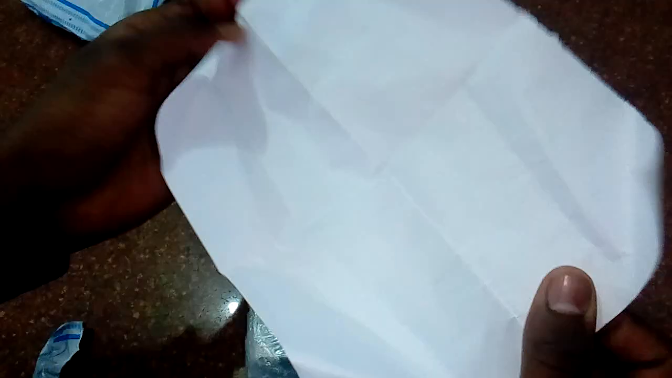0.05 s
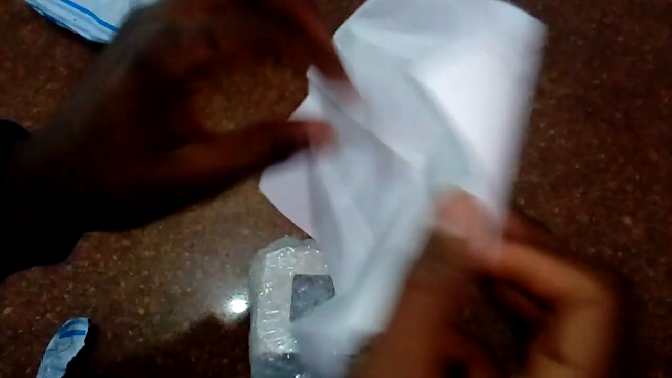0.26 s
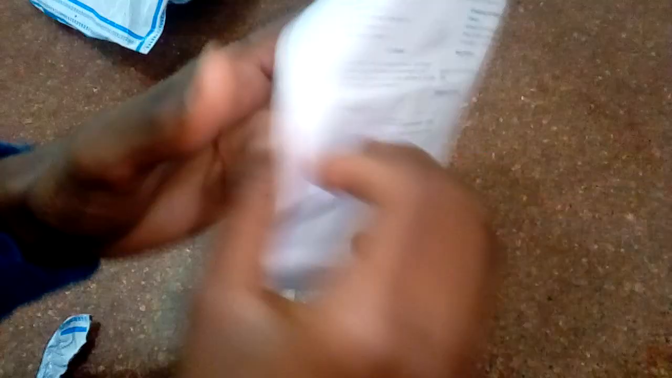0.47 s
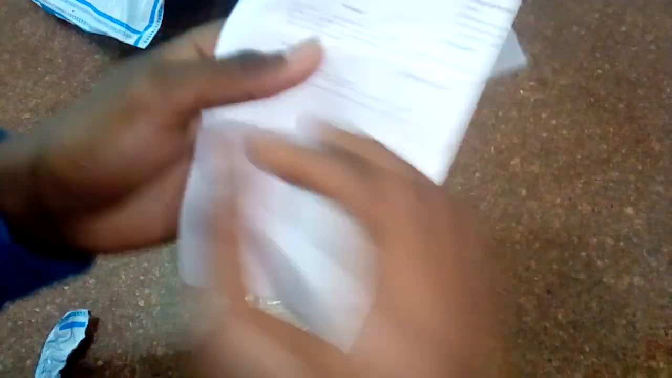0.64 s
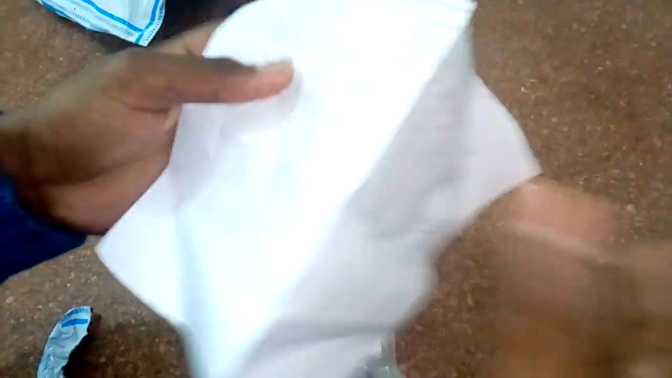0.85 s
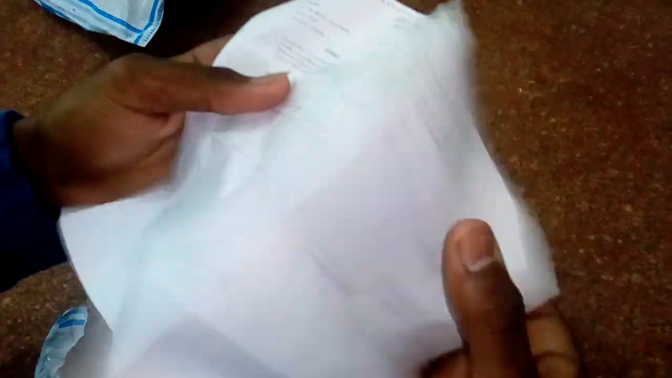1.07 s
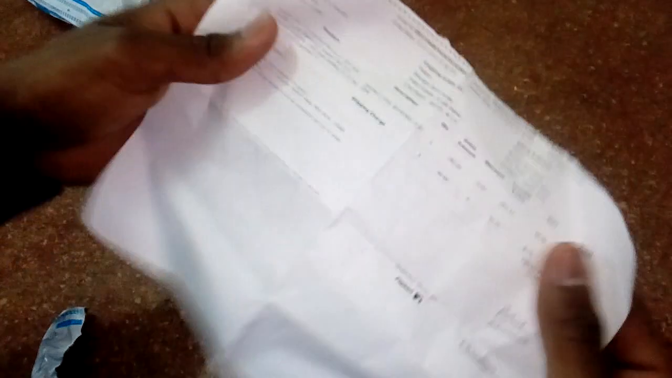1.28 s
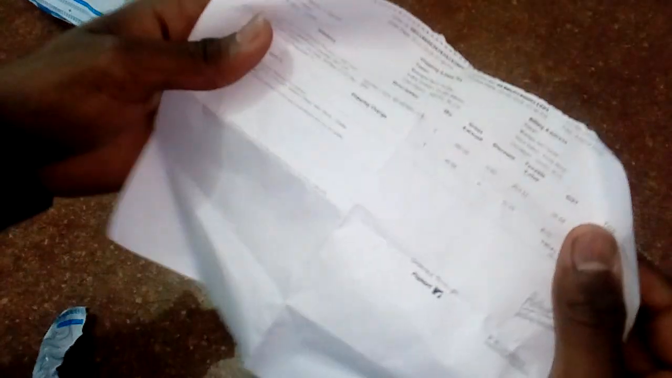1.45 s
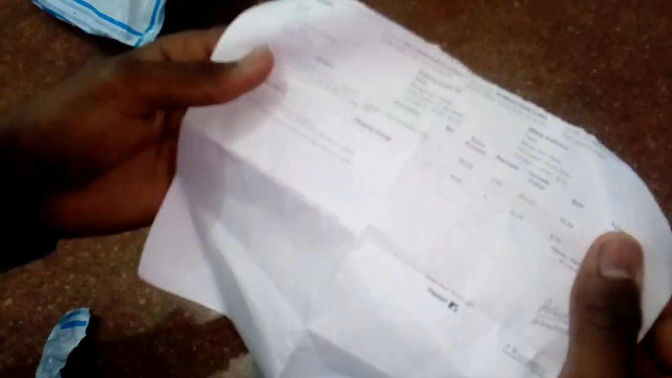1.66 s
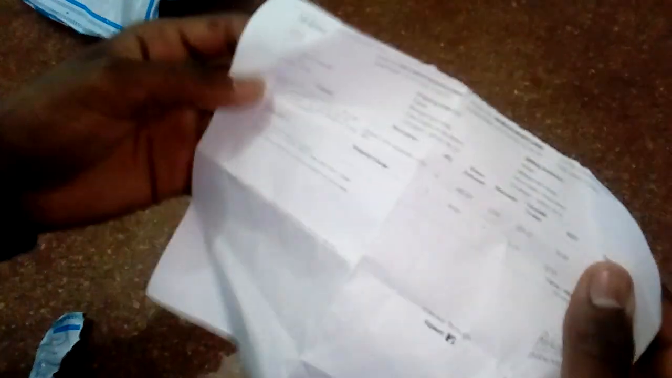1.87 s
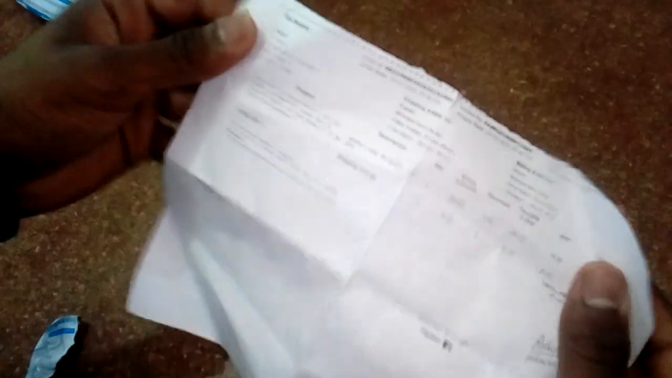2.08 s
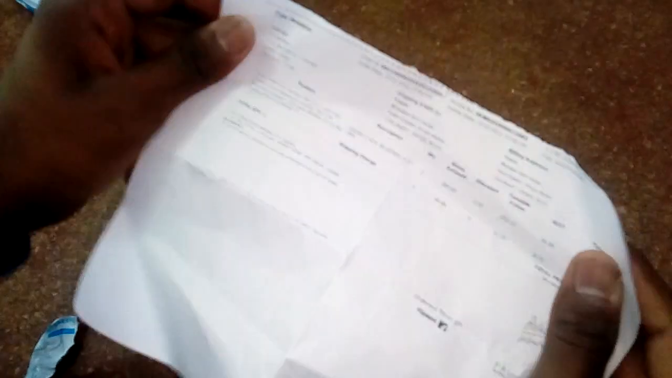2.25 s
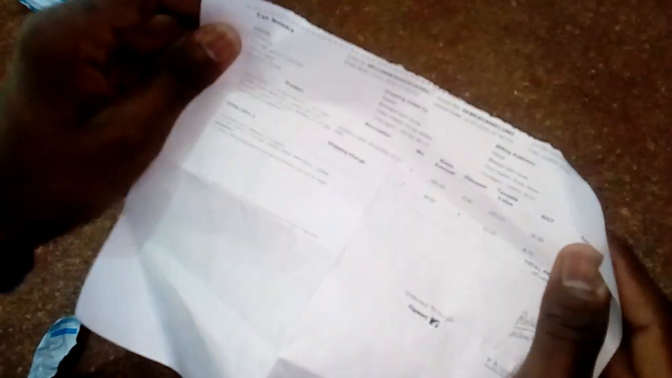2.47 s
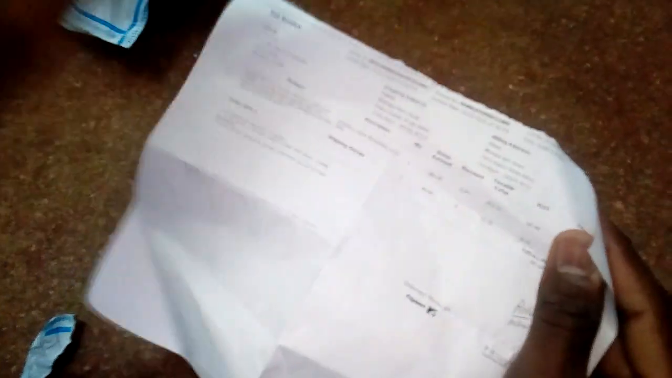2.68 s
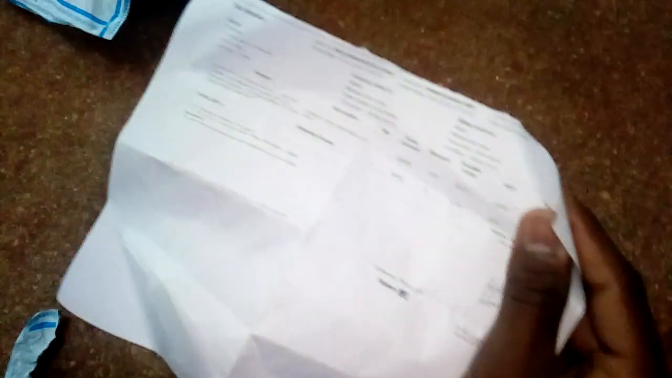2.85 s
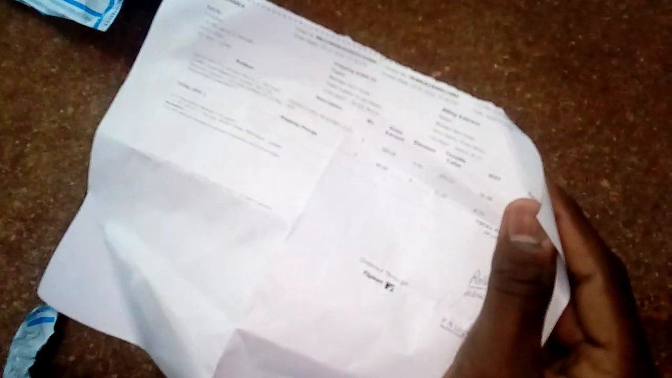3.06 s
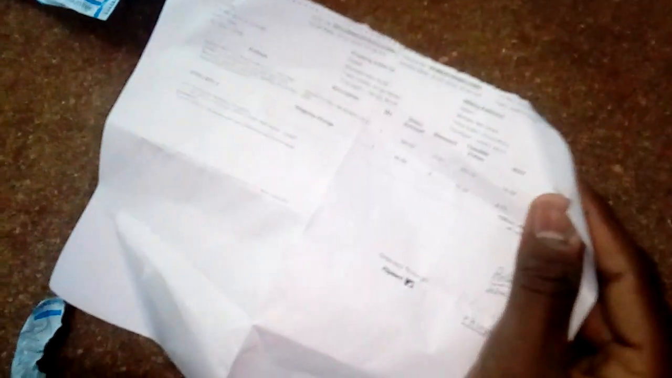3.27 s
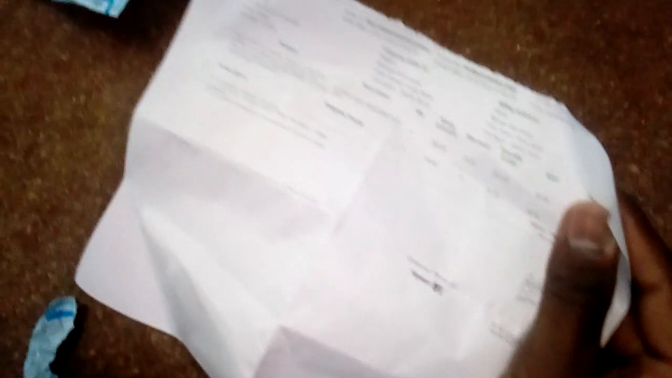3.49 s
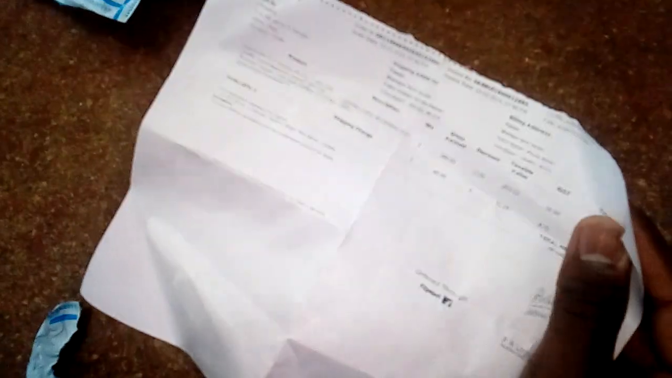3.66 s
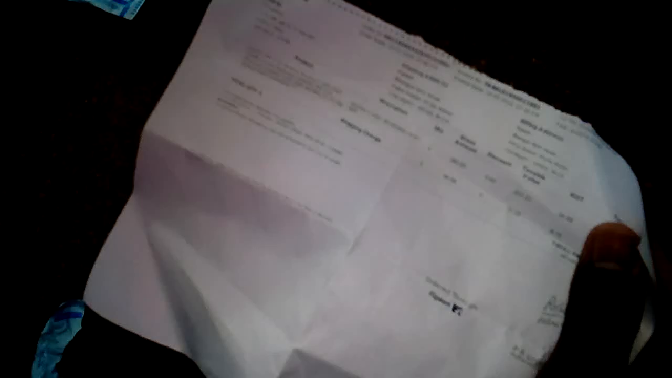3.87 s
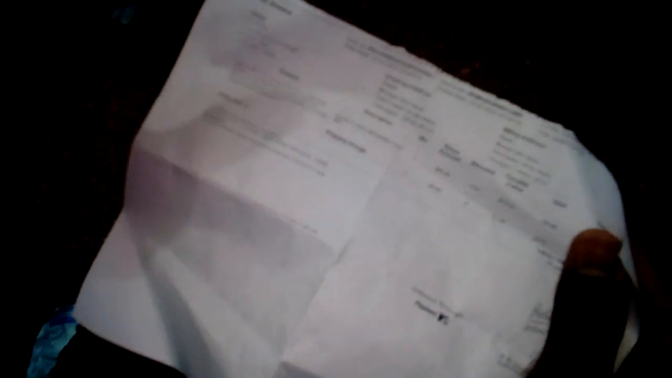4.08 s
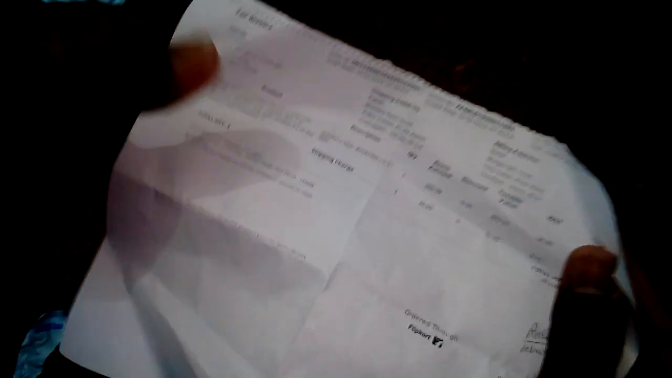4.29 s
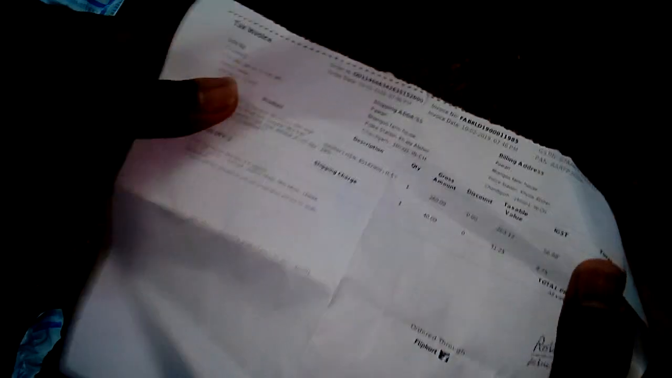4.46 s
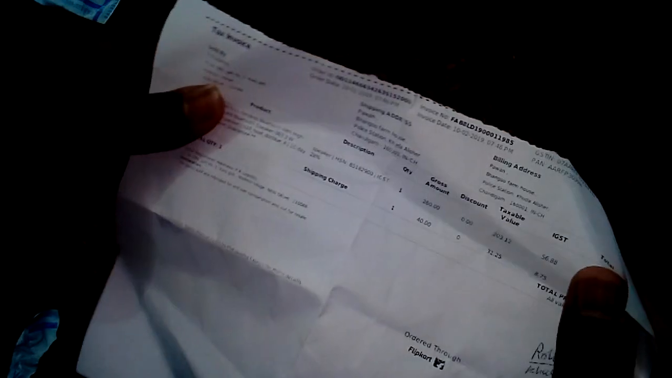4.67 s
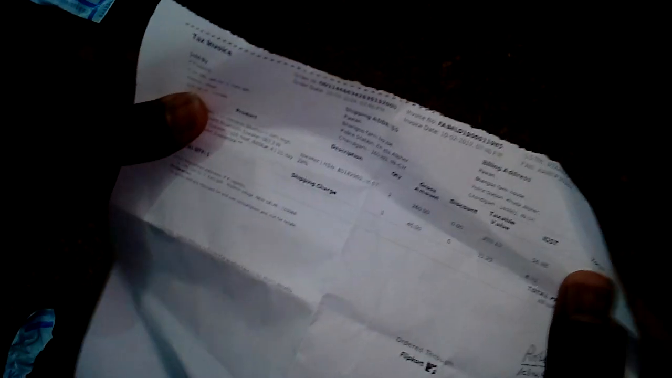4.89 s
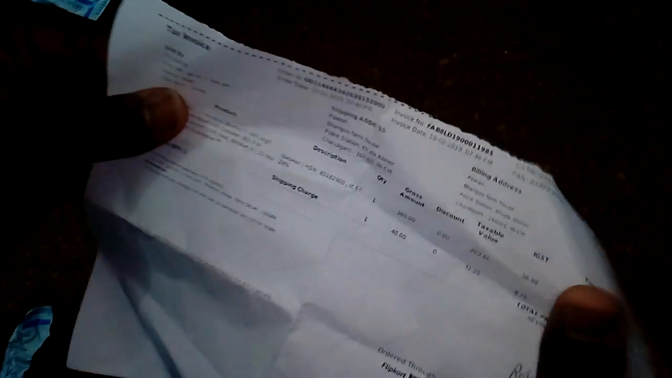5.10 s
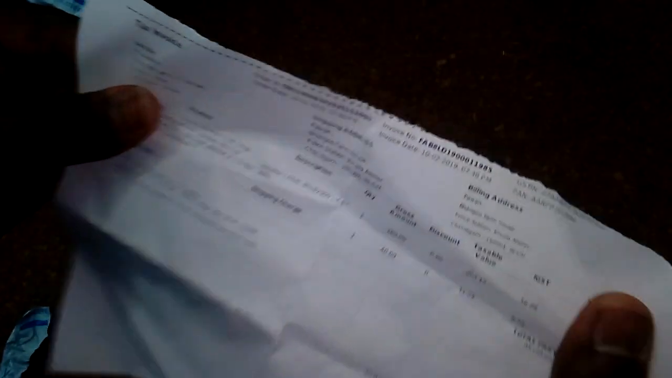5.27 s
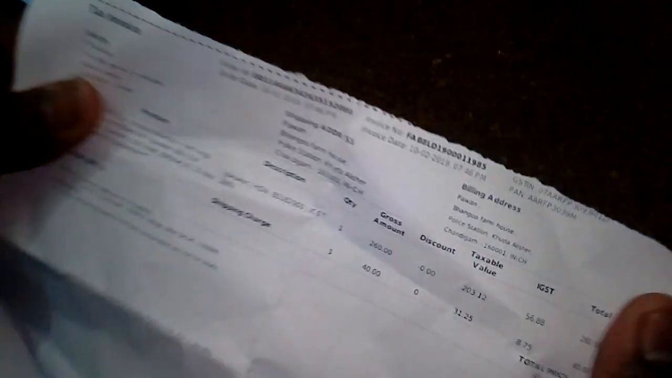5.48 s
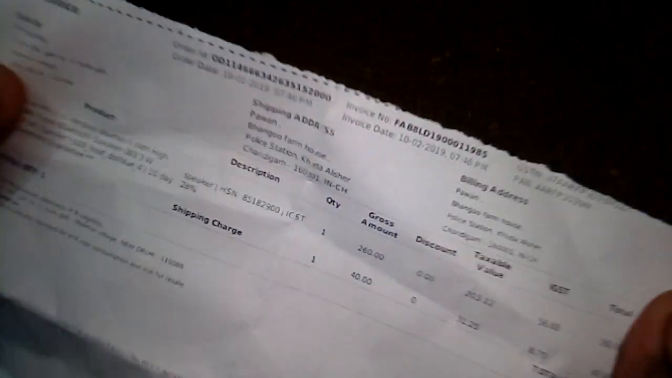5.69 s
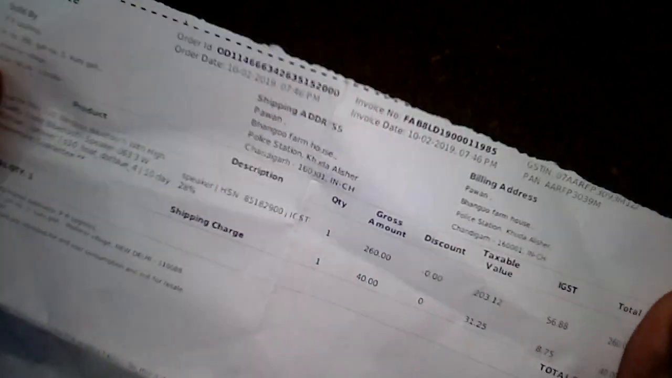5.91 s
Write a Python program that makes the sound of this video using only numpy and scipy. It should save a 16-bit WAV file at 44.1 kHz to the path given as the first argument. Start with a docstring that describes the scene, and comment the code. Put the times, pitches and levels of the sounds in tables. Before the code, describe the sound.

A creased sheet of paper is handled very close to a phone in a small, hard, quiet room. Crackling begins at once, with bright snaps in the first 0.2 seconds, a short lull, then a dense cluster from 0.4 to 0.7 with dull flapping and a puff of air. After another lull, the busiest unfolding runs from about 0.95 to 1.5 seconds: crisp cracks, coarse rustle, fine hiss and low air thumps. Lighter sliding follows, with strong snaps near 2.1, 2.2, 2.3 and 2.55. From 2.7 to about 4.4 it is almost still, except for a dry knock on the phone with a low puff at 3.36 and two fainter touches just after. Soft handling then rises, with sparse crinkles from 4.5, clearer cracks near 5.2 and 5.4, a dull pat at 5.5 and a final pair near 5.9. Low rumble, thin hiss and a faint, evenly throbbing cricket lie behind.

```python
"""Paper rustles and cracks at once: two hands unfold a creased sheet close to a phone, then shift their grip.
Creases snap through in bursts of shaped noise with a ringing fold; random slips make rustle, hiss and crinkle.
Decaying swings of the sheet push puffs of air at the microphone, and a finger knocks the phone's case. A small
hard room answers faintly as decaying noise; behind lie soft handling, a low rumble under a thin hiss, faint
rubs of thumbs on the sheet, and one far cricket, a narrow band of noise that throbs evenly."""
import sys
import numpy as np
from scipy import signal
from scipy.fft import rfft, irfft
from scipy.io import wavfile
from scipy.ndimage import uniform_filter1d

SR = 44100
rng = np.random.default_rng(int(sys.argv[2]) if len(sys.argv) > 2 else 0)


def master_out(mix):
    """Clip the mix to full scale and print it as 16-bit PCM to the path in sys.argv[1]."""
    frames = np.transpose(np.atleast_2d(mix))
    ceiling = np.clip(frames, -1, 1)
    pcm = np.round(ceiling * 32767).astype(np.int16)
    wavfile.write(sys.argv[1], SR, pcm)


N = 261954
TIME = np.arange(N) / SR


def undb(db):
    """Decibels to gain."""
    return 10 ** (np.asarray(db) / 20)


def unit(x):
    """Scale to an rms of 1."""
    return x / np.sqrt(np.mean(x ** 2) + 1e-18)


def add(out, s, x):
    """Mix x into out from time s on."""
    i = max(int(s * SR), 0)
    out[i:i + len(x)] += x[:max(len(out) - i, 0)]


def response(points, size=4096):
    """Causal minimum-phase impulse response with the given (frequency [Hz], level [dB]) colour."""
    hz, db = np.transpose(points)
    f = np.maximum(np.fft.rfftfreq(size, 1 / SR), 1)
    log_gain = np.log(undb(np.interp(np.log(f), np.log(hz), db)))
    # folding the cepstrum onto positive time makes the response causal
    cepstrum = irfft(log_gain)
    cepstrum[1:size // 2] *= 2
    cepstrum[size // 2 + 1:] = 0
    return irfft(np.exp(rfft(cepstrum)))[:size // 2]


def through(x, impulse):
    """Pass x through an impulse response."""
    return signal.fftconvolve(x, impulse)[:len(x)]


def resonate(x, hz, width_hz):
    """One resonance, gain 1 at its centre."""
    return signal.lfilter(*signal.iirpeak(hz, hz / width_hz, fs=SR), x)


def resonate_twice(x, hz, width_hz):
    """Two equal resonances in a row, for steeper flanks."""
    return resonate(resonate(x, hz, width_hz), hz, width_hz)


def walk(rate):
    """Smooth random wander with an rms of about 1, heading for a new value rate times a second."""
    k = max(int(SR / rate), 1)
    steps = np.repeat(rng.standard_normal(N // k + 1), k)
    return unit(uniform_filter1d(steps, k)[:N])


def reflect(x, lag_s, share):
    """Add the inverted echo from a nearby hand or fold; the lag may move."""
    i = np.arange(len(x))
    echo = np.interp(i - lag_s * SR, i, x, left=0)
    return x - np.clip(share, 0, .9) * echo


def slips(rate, spread_db):
    """Tiny catches and releases of fibres at random times, a few much larger than the rest."""
    hit = rng.random(N) < rate / SR
    size = undb(spread_db * np.minimum(rng.exponential(size=N), 4))
    return unit(hit * size * rng.choice([-1, 1], N))


# creases snapping through, close to the microphone; levels are rms over 8 ms:
# (time [s], flap level [dB], crack level [dB], tick level [dB], crack pitch [Hz], buckling length [s])
CREASE_SNAPS = [(0.0806, -54.5, -17.5, -36.5, 2480, 0.0031), (0.0864, -42.5, -29, -32.5, 2650, 0.00095),
                (0.1145, -38.5, -19, -29.5, 2960, 0.0037), (0.1464, -35.5, -23, -27, 2700, 0.0037),
                (0.162, -44, -32.5, -54, 2420, 0.0032), (0.392, -22.5, -22.5, -37, 2180, 0.0011),
                (0.4276, -30, -32.5, -48, 2600, 0.0039), (0.4952, -36, -20.5, -30, 2980, 0.0018),
                (0.511, -35, -23.5, -38.5, 1960, 0.0048), (0.556, -28.5, -20, -29.5, 2540, 0.0033),
                (0.5705, -25, -27.5, -30.5, 2520, 0.0018), (0.665, -35, -37, -38, 2600, 0.0004),
                (0.937, -64.5, -43.5, -52.5, 2760, 0.0009), (0.983, -31, -20.5, -37, 2870, 0.0042),
                (1.0092, -34.5, -20, -39, 2580, 0.0026), (1.0192, -26, -19.5, -39, 2340, 0.0021),
                (1.0715, -31, -32, -31.5, 2570, 0.0074), (1.111, -35, -18.5, -30.5, 2550, 0.0028),
                (1.1314, -25.5, -17.5, -36.5, 2540, 0.011), (1.1767, -29.5, -30, -42.5, 2400, 0.00041),
                (1.203, -36.5, -34.5, -44, 2500, 0.00063), (1.267, -24.5, -21.5, -35.5, 2640, 0.004),
                (1.32, -30.5, -28, -33, 2820, 0.0017), (1.3419, -29, -24, -31.5, 2480, 0.00061),
                (1.3851, -29.5, -22, -45, 1800, 0.0032), (1.4535, -34.5, -23.5, -43.5, 2240, 0.0011),
                (1.6987, -43.5, -25, -42, 2780, 0.0011), (2.1029, -36, -21, -28, 2700, 0.0024),
                (2.115, -34, -26, -31, 2590, 0.0029), (2.2041, -29.5, -17.5, -26.5, 2770, 0.0033),
                (2.328, -30, -19, -36, 2030, 0.0014), (2.5573, -25.5, -25.5, -44, 2467, 0.0059),
                (4.508, -52, -45, -51.5, 2470, 0.0049), (4.723, -34.5, -32, -60.5, 1960, 0.0034),
                (4.9446, -42, -43, -49.5, 2560, 0.0028), (5.1741, -33, -20.5, -38.5, 2580, 0.0016),
                (5.372, -29, -22, -29, 2600, 0.0038), (5.4527, -44.5, -36.5, -80, 2790, 0.00077),
                (5.8909, -30.5, -26, -41, 2210, 0.0057), (5.898, -30.5, -24, -35.5, 2750, 0.0027)]
# colours of the swinging panel, the cracking fold and the ticking edge: (frequency [Hz], relative level [dB])
FLAP_COLOUR = [(90, -1.5), (190, 0.5), (300, -1.5), (430, 9.5), (560, -2.5), (760, 8.5), (1150, -5),
               (1600, -6.5), (2300, -19.5), (4000, -59.5)]
CRACK_COLOUR = [(700, -32.5), (1400, 3.5), (2000, 1), (2900, 5.5), (3400, -4), (4200, -6.5), (5500, -30.5),
                (8000, -49.5)]
TICK_COLOUR = [(3000, -50), (4300, -12), (5200, -1), (6000, 8.5), (6600, 10.5), (7300, -4.5), (8300, -20),
               (10300, -15), (13500, -38.5), (15200, -17)]


def snaps(ring_width_hz=700, ring_s=0.0091, spread_width_hz=900, plain=0.19, fibres=0.21, flutter_db=-22,
          flutter_s=0.048, strain_db=-26, strain_s=0.0018, echo=0.6, size=2048):
    """A crease strains, then gives way: a jolt and a run of smaller ones shake the panel, ring the fold and tick.
    Returns the sound at the phone and the broader sound that the whole sheet spreads into the room."""
    lead = size // 8  # samples of straining before the jolt
    near, spread = np.zeros(N), np.zeros(N)
    t = (np.arange(size) - lead) / SR
    flap, crack, tick = response(FLAP_COLOUR), response(CRACK_COLOUR), response(TICK_COLOUR)
    window = np.sqrt(.008 * SR / size)  # makes levels rms over 8 ms
    strain = undb(strain_db) * np.exp(-abs(t) / strain_s)
    flutter = undb(flutter_db) * np.exp(-abs(t) / flutter_s)
    lags = rng.uniform(.001, .003, len(CREASE_SNAPS))
    grits = rng.standard_normal((len(CREASE_SNAPS), 2, size))
    for (s, flap_db, crack_db, tick_db, hz, length), lag, grit in zip(CREASE_SNAPS, lags, grits):
        # fibres creak just before; the buckle runs along the fold and stops; the panel flutters a little longer
        run = np.exp(-(t / max(length, 1 / SR)) ** 2)
        force = fibres * grit * np.where(t < 0, strain, run + flutter)
        force[:, lead] += 1
        # every crease lies at its own distance from the hands, which gives it its own hollow colour
        push = reflect(force[0], lag, echo)
        # the panel moves only once the crease has let go
        panel = undb(flap_db) * unit(through(push * (t >= 0), flap))
        knock = through(push, crack)
        # the fold rings only while it is giving way
        fold = resonate(knock * np.exp(-abs(t) / ring_s), hz, ring_width_hz) + plain * knock
        sheet = resonate(through(force[0], crack), hz, spread_width_hz)
        edge = undb(tick_db) * unit(through(force[1], tick))
        for out, middle in ((near, fold), (spread, sheet)):
            add(out, s - lead / SR, window * (panel + undb(crack_db) * unit(middle) + edge))
    return near, spread


# strokes of paper over paper and skin, levels before the trims of each layer:
# (start [s], length [s], rustle level [dB], hiss level [dB])
PAPER_STROKES = [(0.0, 0.0033, -33.5, -42.5), (0.053, 0.041, -43.5, -45.5), (0.088, 0.08, -39, -55.5),
                 (0.203, 0.08, -47.5, -54.5), (0.393, 0.059, -36, -45), (0.485, 0.025, -33, -50),
                 (0.525, 0.035, -29, -35.5), (0.614, 0.075, -36.5, -43.5), (0.751, 0.12, -49, -51),
                 (0.973, 0.0081, -32, -53), (1.033, 0.037, -36, -43), (1.101, 0.11, -35.5, -53.5),
                 (1.241, 0.098, -36.5, -42), (1.356, 0.051, -41, -49.5), (1.483, 0.049, -43.5, -50),
                 (1.624, 0.087, -49.5, -54.5), (1.744, 0.1, -45, -43.5), (1.853, 0.013, -34, -33.5),
                 (1.901, 0.015, -39, -36), (1.946, 0.023, -46.5, -46), (2.052, 0.05, -52, -59),
                 (2.107, 0.036, -37.5, -49.5), (2.173, 0.16, -41.5, -45.5), (2.51, 0.063, -51.5, -50.5),
                 (2.597, 0.039, -50, -51), (2.64, 0.0026, -38.5, -37), (4.49, 0.18, -53.5, -63),
                 (4.98, 0.064, -52, -60), (5.047, 0.089, -48.5, -50.5), (5.18, 0.062, -58, -62),
                 (5.371, 0.012, -44.5, -56), (5.508, 0.0059, -39, -39), (5.735, 0.051, -51.5, -62)]
SWELL_DB_PER_S = 1500
# the hiss ends with the contact, the sheet settles later
RUSTLE_FALL_DB_PER_S, HISS_FALL_DB_PER_S = 252.5, 515.5
SILENT_DB = -140  # floor of each stroke


def stroke_gain(levels_db, fall_db_per_s):
    """Gain of all strokes together: each swells up to its start, holds for its length and falls away."""
    power = np.zeros(N)
    for (start, length, _, _), db in zip(PAPER_STROKES, levels_db):
        early = np.maximum(start - TIME, 0)
        late = np.maximum(TIME - start - length, 0)
        level_db = db - SWELL_DB_PER_S * early - fall_db_per_s * late
        power += undb(np.maximum(level_db, SILENT_DB)) ** 2
    return np.sqrt(power)


# colours of the coarse and the fine sliding: (frequency [Hz], relative level [dB])
RUSTLE_COLOUR = [(110, -9.5), (220, 6), (340, -6), (440, 7.5), (580, -4), (800, -1.5), (1250, -9.5),
                 (1900, -2), (2800, 2), (3500, -19.5), (4700, -26), (7000, -47)]
HISS_COLOUR = [(1400, -34), (2600, -1), (3300, 4.5), (4700, -23), (5700, 2), (6600, 7.5), (7300, -7),
               (8400, -20), (10300, -11.5), (13500, -26.5), (15000, -8)]


def sliding(flex, contact, rustle_db=-3, hiss_db=-1.0, jerk_db=2.5, echo=0.72, gap_s=0.00179, sway=.2):
    """Paper drags over paper and skin in jerks: coarse slips rustle in the sheet, fine ones hiss."""
    coarse = slips(rate=1500, spread_db=3.0)
    fine = unit(slips(rate=12000, spread_db=5.5) + 0.96 * coarse)
    # the gap between sheet and hand opens and closes, so the colour shifts
    lag = gap_s * np.exp(sway * walk(rate=6.5))
    body = unit(through(reflect(coarse, lag, echo), response(RUSTLE_COLOUR)))
    surface = unit(through(fine, response(HISS_COLOUR)))
    drag = body * flex * undb(rustle_db) + surface * contact * undb(hiss_db)
    return drag * undb(jerk_db * walk(rate=110))


def crinkles(flex, contact, low_hz=1100, high_hz=3400, q=7.5, count=7, firm_db=-37, pops_db=-7,
             crackle_hz=4300, crackle_width_hz=1900, crackle_db=-9):
    """Small wrinkles pop at several pitches, the finest merge into bright crackle; both fade on a barely bent sheet."""
    pitches = np.geomspace(low_hz, high_hz, count)
    pops = sum(resonate(slips(rate=40, spread_db=4.5), hz, hz / q) for hz in pitches)
    pops = unit(through(pops, response(CRACK_COLOUR))) * undb(pops_db) * flex
    crackle = resonate_twice(slips(rate=1200, spread_db=3.8), crackle_hz, crackle_width_hz)
    crackle = unit(crackle) * undb(crackle_db) * np.sqrt(flex * contact)
    bent = np.sqrt(np.minimum(flex / undb(firm_db), 1))
    return bent * (pops + crackle)


def bursts(times, levels_db, colour, decay_s):
    """Short scrapes of one colour that start at once and die away."""
    gain = np.zeros(N)
    for s, db in zip(times, levels_db):
        add(gain, s, undb(db) * np.exp(-TIME[:SR // 4] / decay_s))
    impulse = response(colour)
    return through(gain * rng.standard_normal(N), impulse / np.linalg.norm(impulse))


# an edge of the sheet catches on the skin and scrapes free, before catch_db:
# (time [s], rasp level [dB], hiss level [dB])
EDGE_CATCHES = [(0.202, -43, -41.5), (1.104, -29, -38), (1.492, -45, -39), (1.647, -46, -48),
                (1.758, -38.5, -35.5), (2.2515, -35, -41), (2.316, -34.5, -37), (2.55, -47, -38.5),
                (2.648, -39.5, -35.5), (2.663, -46, -43), (4.556, -50, -48), (5.052, -42, -44),
                (5.138, -42, -42.5), (5.502, -39, -36.5), (5.678, -54.5, -54.5)]
# fingers pat the loose sheet, dull and without a crack, before pat_db: (time [s], level [dB])
FINGER_PATS = [(1.883, -35.5), (1.978, -40.5), (2.37, -44.5), (4.972, -44.5), (5.53, -30)]


def touches(catch_s=0.0048, pat_s=0.0078, catch_db=3, pat_db=3):
    """Catching edges rasp and hiss; pats of the fingers only shake the panel."""
    caught, rasp_db, hiss_db = np.transpose(EDGE_CATCHES)
    rasps = bursts(caught, rasp_db, CRACK_COLOUR, catch_s)
    hisses = bursts(caught, hiss_db, HISS_COLOUR, catch_s)
    pats = bursts(*np.transpose(FINGER_PATS), FLAP_COLOUR, pat_s)
    return undb(catch_db) * (rasps + hisses) + undb(pat_db) * pats


# air pushed by the whole sheet, and at 3.36 s the low thump of the finger knocking the phone, # before gain_db
# and the envelope: (time [s], level [dB], frequency [Hz])
AIR_PUFFS = [(0.665, -17.5, 158), (0.968, -25, 152), (1.018, -16.5, 225), (1.134, -17.5, 202),
             (1.333, -22, 181), (1.885, -25.5, 200), (2.204, -21, 113.4), (3.3617, -21, 83.7),
             (4.948, -32, 230), (5.371, -14, 213), (5.896, -28.5, 115)]
PUFF_CYCLES = 4.73  # swings of the sheet until it has died away by 60 dB


def puffs(rise_s=0.00138, gain_db=3):
    """A few slow cycles of air reach the microphone: mostly the whole sheet swinging, once the thump of a
    knock."""
    out, t = np.zeros(N), TIME[:SR // 4]
    for s, db, hz in AIR_PUFFS:
        rise = 1 - np.exp(-t / rise_s)
        fall = np.exp(-np.log(1000) * t * hz / PUFF_CYCLES)
        add(out, s, undb(db + gain_db) * np.sin(2 * np.pi * hz * t) * rise * fall)
    return out


# a finger knocks on the phone itself, then touches it twice more softly:
# (time [s], rms level over 8 ms [dB], decay time of the push [s])
PHONE_TAPS = [(3.36, -30, 0.000011), (3.4556, -47.5, 0.000092), (3.4675, -45, 0.00016)]
# colour of the case: (frequency [Hz], relative level [dB])
TAP_COLOUR = [(150, 6.5), (420, 2), (600, -4.5), (1000, 2.5), (1800, -4), (2300, -17), (2700, -6),
              (3500, -15.5), (4800, -35), (6600, -7), (8200, -29), (11000, -26), (14500, -50)]


def taps(size=512):
    """Knocks reach the microphone through the case, dry and without the room; a longer push is duller."""
    out, colour = np.zeros(N), response(TAP_COLOUR)
    window = np.sqrt(.008 * SR / size)  # makes levels rms over 8 ms
    for s, db, length in PHONE_TAPS:
        push = np.exp(-TIME[:size] / length)
        add(out, s, -undb(db) * window * unit(through(push, colour)))
    return out


# hands and sleeves moving near the phone, before band levels and wander: (time [s], level [dB])
HANDLING_LEVEL = [(0, -62), (1.4, -62), (2.8, -74), (4.15, -67.5), (4.38, -56.5), (5.94, -58)]


def handling(boom_hz=72, rub_hz=290, q=1.5, boom_db=3, rub_db=-1):
    """Hands and sleeves make a soft boom and a dull rub, two bands of noise that wander in level."""
    bands = np.zeros(N)
    for hz, db in ((boom_hz, boom_db), (rub_hz, rub_db)):
        bands += undb(db) * unit(resonate_twice(rng.standard_normal(N), hz, hz / q))
    level_db = np.interp(TIME, *np.transpose(HANDLING_LEVEL))
    return bands * undb(level_db + 2 * walk(rate=11))


# faint bands of noise that swell and fade: thumbs rubbing and scuffing the sheet, and at 2.385 s a narrow ring
# just after a crack: (middle [s], half width [s], level [dB], pitch [Hz], bandwidth of each of two resonances
# [Hz])
THUMB_RUBS = [(2.385, 0.049, -54, 2170, 400), (2.532, 0.028, -43, 2655, 1700),
              (3.48, 0.025, -64.5, 1001, 1400), (4.39, 0.12, -67, 2106, 378), (4.86, 0.21, -63.5, 1970, 460),
              (5.6, 0.24, -63, 2010, 600), (5.751, 0.039, -56.5, 2550, 1600),
              (5.757, 0.033, -59.5, 6200, 1700)]


def thumb_rubs():
    """Dense soft noise swells and fades in one band, with its own pitch and width for each row."""
    grain = slips(rate=4200, spread_db=1.5)
    out = np.zeros(N)
    for s, half, db, hz, width_hz in THUMB_RUBS:
        swell = np.exp(-((TIME - s) / half) ** 2)
        out += unit(resonate_twice(grain, hz, width_hz)) * undb(db) * swell
    return out


ROOM_DB, ROOM_T60_S, ROOM_TREBLE_T60_S = -15, 0.53, 0.44


def room(x, split_hz=1900, first_s=0.0018, treble_db=-4):
    """Diffuse answer of floor and walls; the treble is weaker and dies sooner."""
    t = TIME[:SR]
    low_pass = signal.butter(2, split_hz, fs=SR, output="sos")
    high_pass = signal.butter(2, split_hz, "high", fs=SR, output="sos")
    low = signal.sosfilt(low_pass, rng.standard_normal(SR))
    high = signal.sosfilt(high_pass, rng.standard_normal(SR))
    tail = low * np.exp(-np.log(1000) * t / ROOM_T60_S)
    tail += undb(treble_db) * high * np.exp(-np.log(1000) * t / ROOM_TREBLE_T60_S)
    # silent until the first reflection; scaled by the energy of the decay
    tail *= (t > first_s) / np.sqrt(SR * ROOM_T60_S / (2 * np.log(1000)))
    return undb(ROOM_DB) * through(x, tail)


def cricket(hz=5380):
    """A far cricket chirps evenly; the walls smear its wing strokes into a narrow throbbing band."""
    period_s, chirp_s, width_hz, db, pause_db = .1595, 4.028, 320, -69.5, -13
    band = unit(resonate_twice(rng.standard_normal(N), hz, width_hz))
    cycle = np.cos(2 * np.pi * (TIME - chirp_s) / period_s)
    wings = (1 + np.tanh(2 * cycle - .5)) / 2
    return band * undb(db + pause_db * (1 - wings))


# colour of the room at rest: (frequency [Hz], relative level per Hz [dB])
AMBIENCE_COLOUR = [(40, -13.5), (70, 2), (120, -1), (170, -9.5), (280, -22), (600, -33.5), (1200, -39),
                   (2700, -39), (4600, -47), (6300, -43.5), (8000, -57), (13500, -57), (15000, -50.5)]
AMBIENCE_DB = -48  # rms


def ambience():
    """Low rumble under a thin even hiss, as steady shaped noise."""
    return undb(AMBIENCE_DB) * unit(through(rng.standard_normal(N), response(AMBIENCE_COLOUR)))


def scene():
    """The paper close by, its room, the hands and the background."""
    _, _, rustle_db, hiss_db = np.transpose(PAPER_STROKES)
    flex = stroke_gain(rustle_db, RUSTLE_FALL_DB_PER_S)
    contact = stroke_gain(hiss_db, HISS_FALL_DB_PER_S)
    near, spread = snaps()
    soft = sliding(flex, contact) + crinkles(flex, contact) + touches() + thumb_rubs()
    close = near + soft + room(spread + soft) + puffs()
    return (close + taps() + handling() + cricket() + ambience())[None]


TOP_HZ = 15450


def record(dry):
    """The phone rounds the tallest peaks and cuts the top."""
    ceiling = .7
    rounded = ceiling * np.tanh(dry / ceiling)
    return signal.sosfilt(signal.ellip(8, .2, 70, TOP_HZ, fs=SR, output="sos"), rounded)


dry = scene()
out = record(dry)
master_out(out)
```